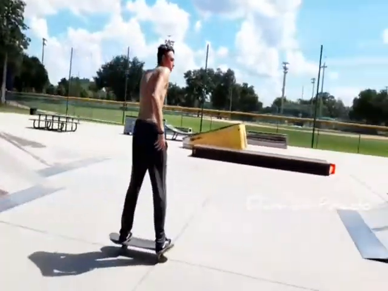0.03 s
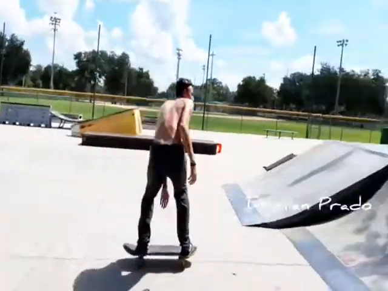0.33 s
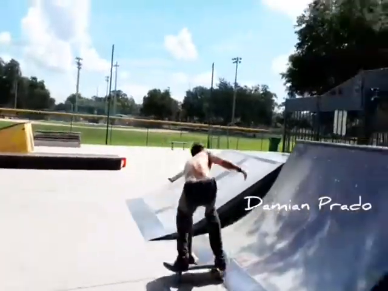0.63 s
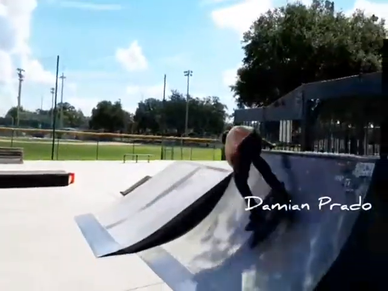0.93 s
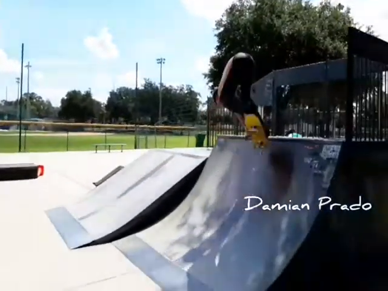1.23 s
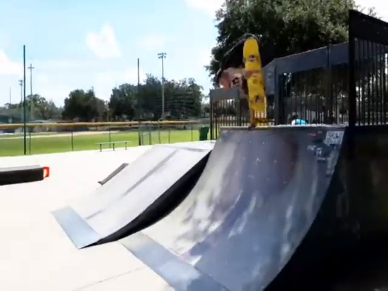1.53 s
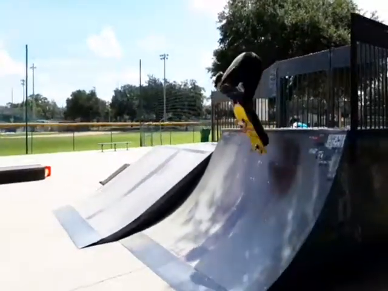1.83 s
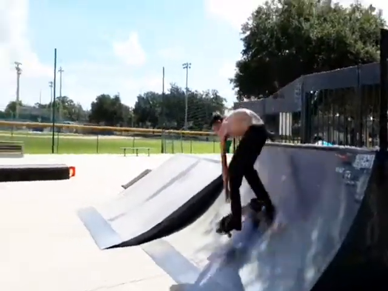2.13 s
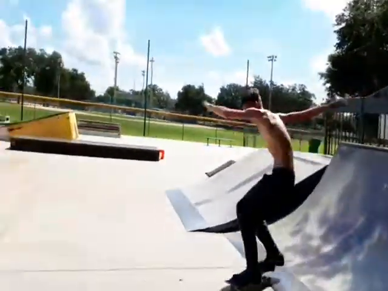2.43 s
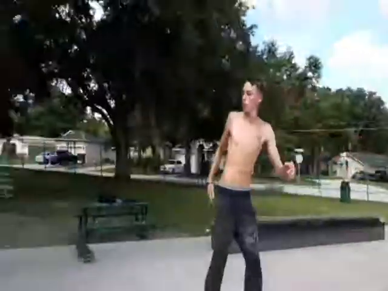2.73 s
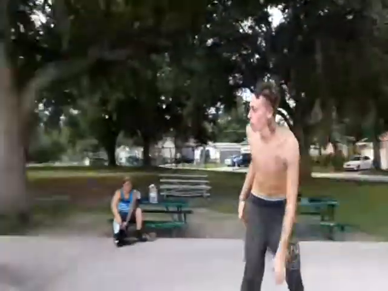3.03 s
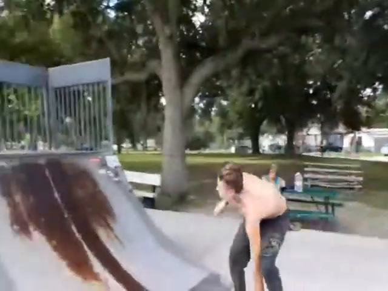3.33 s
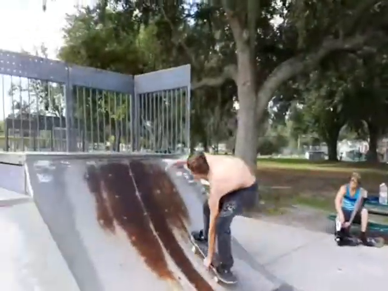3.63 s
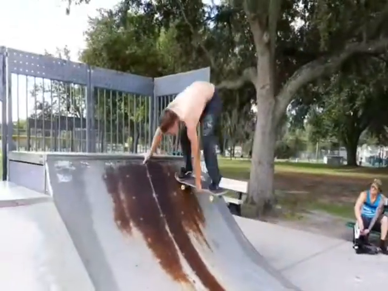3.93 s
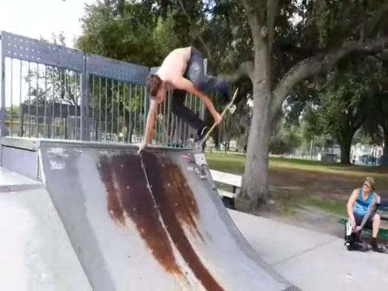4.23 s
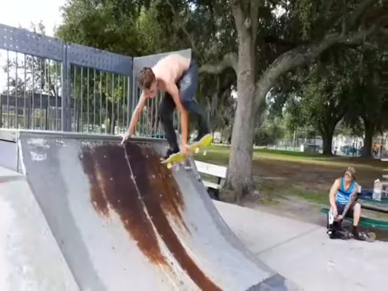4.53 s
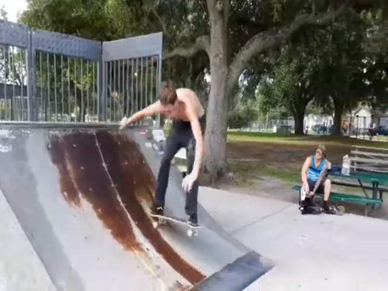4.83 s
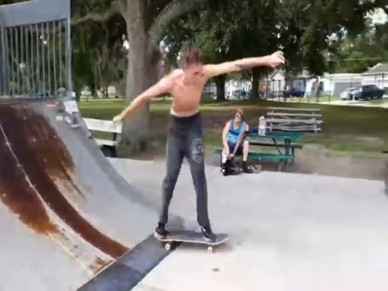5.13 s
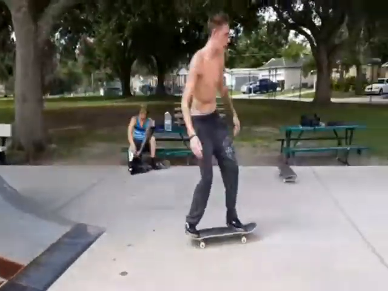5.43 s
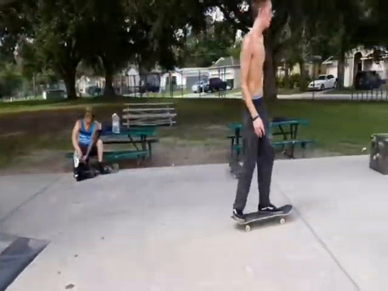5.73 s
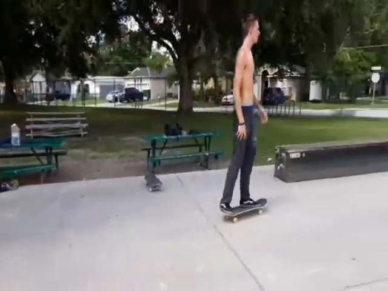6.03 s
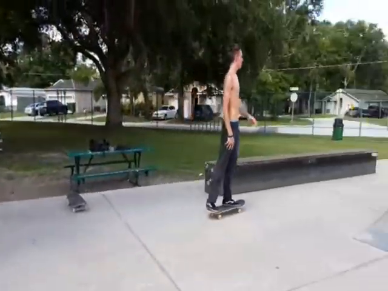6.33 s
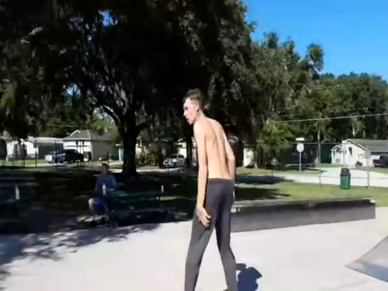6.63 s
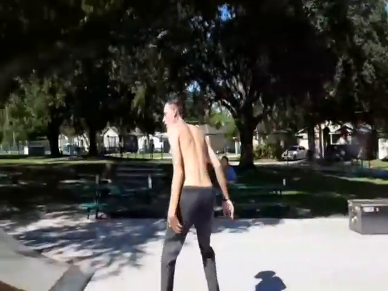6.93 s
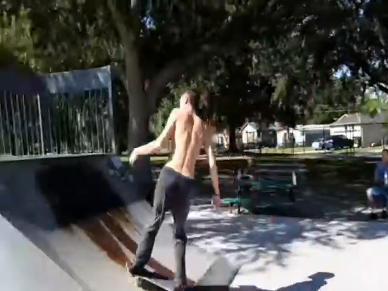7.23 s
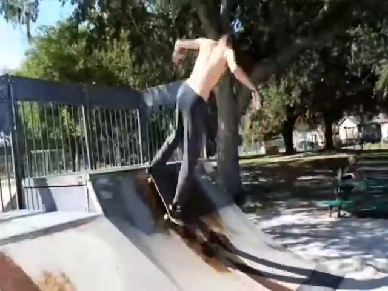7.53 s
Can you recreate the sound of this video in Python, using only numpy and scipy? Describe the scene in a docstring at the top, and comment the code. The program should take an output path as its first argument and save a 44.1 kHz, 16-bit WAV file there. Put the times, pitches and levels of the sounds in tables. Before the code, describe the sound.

A skateboard rolls over concrete and booms up and down hollow steel ramps, with sharp clacks, metal rattles and landing slaps.

```python
"""A skateboard rolls back and forth between two steel quarter pipes in an open park, close by.
Surface roughness drives the hard wheels into a roar and the hollow ramps into a resonant boom.
Impacts excite the modes of ground, deck and trucks as the board clacks over joints, pops off the
coping and slaps down; loose steel lip plates chatter, and gritty hisses fade away.
The impacts scatter into a thin reverberant tail, over distant traffic, leaves and insects."""
import sys
import numpy as np
from scipy import signal
from scipy.fft import rfft, irfft, next_fast_len
from scipy.io import wavfile
from scipy.ndimage import uniform_filter1d, map_coordinates

SR = 44100
rng = np.random.default_rng(int(sys.argv[2]) if len(sys.argv) > 2 else 0)


def unload_audio(sound):
    """Save the sound as a 16-bit wav file, at the path given as the first command line argument."""
    columns = np.transpose(np.atleast_2d(sound))
    # keep every value between -1 and 1, then stretch to whole-number steps
    steps = np.round(np.clip(columns, -1, 1) * 32767)
    wavfile.write(sys.argv[1], SR, steps.astype(np.int16))


N = 339504


def amp(db):
    """Decibels to amplitude ratio."""
    return 10 ** (np.asarray(db) / 20)

def unit(x):
    """Normalisation to rms 1."""
    return x / np.sqrt(np.mean(x ** 2) + 1e-20)

def along(points, hz):
    """Interpolation of (frequency, value) points on a logarithmic axis."""
    frequencies, values = np.transpose(points)
    return np.interp(np.log(hz + 1), np.log(frequencies + 1), values)

def curve(points):
    """Linear interpolation of (time, value) points at every sample."""
    return np.interp(np.arange(N) / SR, *np.transpose(points))

def held(starts, values):
    """A step function: each value holds from its start, with a brief cross-fade."""
    index = np.maximum(np.searchsorted(starts, np.arange(N) / SR, side="right") - 1, 0)
    return uniform_filter1d(np.asarray(values, float)[index], size=SR // 50)

def wobble(rate_hz):
    """Smooth random modulation: a spline through Gaussian knots."""
    knots = rng.standard_normal(int(N * rate_hz / SR) + 4)
    return map_coordinates(knots, [np.arange(N) * rate_hz / SR])

def add(track, start_s, sound):
    """Superposition of a sound on the track."""
    part = track[:, max(round(start_s * SR), 0):][:, :sound.shape[1]]
    part += sound[:, :part.shape[1]]

def panned(x, pan_db):
    """Constant-power panning, positive to the left."""
    gains = amp(np.array([pan_db, -pan_db]).reshape(2, -1) / 2)
    return x * gains / np.sqrt(np.mean(gains ** 2, axis=0))

def filtered(x, response):
    """Linear filtering: the spectrum times a frequency response."""
    n = x.shape[-1]
    padded = next_fast_len(n + 4096, real=True)
    return irfft(rfft(x, padded) * response(np.fft.rfftfreq(padded, 1 / SR)), padded)[..., :n]

def colour(points):
    """A band-pass response that follows a spectrum and falls steeply beyond its ends."""
    low_hz, high_hz = points[0][0], points[-1][0]
    return lambda f: (amp(along(points, f)) * np.minimum(f / low_hz, 1) ** 2
                      / np.sqrt(1 + (f / high_hz) ** 8))

def minimum_phase(gain):
    """Causality: folding the cepstrum gives a response that rings only after the blow."""
    cepstrum = irfft(np.log(gain + 1e-6))
    cepstrum[1:len(gain) - 1] *= 2
    cepstrum[len(gain):] = 0
    return np.exp(rfft(cepstrum))

def body(modes):
    """Modal resonance: damped modes add in power, and little radiates outside their range."""
    def response(f):
        power = sum((amp(db) * f * width) ** 2 / ((hz * hz - f * f) ** 2 + (f * width) ** 2)
                    for hz, width, db in modes)
        skirts = (1 + (modes[0][0] * .6 / (f + 1)) ** 4) * (1 + (f / (modes[-1][0] * 1.2)) ** 8)
        return minimum_phase(np.sqrt(power / skirts))
    return response

# Likeness of left and right: frequency_hz, coherence_ratio
COHERENCE = [(30, .5), (80, .9), (170, .98), (350, .985), (700, .93), (1400, .78), (3000, .62), (6000, .35),
             (12000, .15)]
def radiate(force, response):
    """Partial coherence: two filtered forces give a stereo pair, less alike in the treble."""
    def spread(f):
        angle = np.arccos(np.clip(along(COHERENCE, f), -1, 1)) / 2
        return response(f) * np.array([np.cos(angle), np.sin(angle)])
    mid, side = filtered(force, spread)
    return np.array([mid + side, mid - side])


# Modes of the concrete and the two ramps: pitch_hz, width_hz, level_db
SLAB = [(102, 48, -6), (169, 150, -2), (316, 66, -1), (404, 35, -4.5)]
PALE_RAMP = [(125, 130, -2), (168.4, 20.5, -6), (196, 31, 1.5), (248, 12, 3), (288.4, 20, 1),
             (337, 24, -1.5), (360.4, 12, 4), (411, 43, -3)]
RUSTY_RAMP = [(64, 20, -22), (93, 6.8, 4), (132, 34, -4), (177.4, 27, 1.5), (233, 26, -2.5),
              (295, 24, -0.5), (360, 66, -3.5), (432, 31, -4.5)]
# Surface under the wheels: start_s, boom_over_roar_db, wheel_resonance_ratio, modes
SURFACES = [(0, -3, 0.64, SLAB), (.66, 8, 0.47, PALE_RAMP), (2.6, -1, 0.92, SLAB),
            (3.46, 8, 0.53, RUSTY_RAMP), (5.25, -1.5, 1.31, SLAB), (6.401, 1.5, 1.03, SLAB),
            (7.18, 11, .8, RUSTY_RAMP)]
def ground_boom(force):
    """Forced vibration: each surface in turn booms in its own modes."""
    track, fade = np.zeros((2, N)), SR // 50
    edges = [round(start_s * SR) for start_s, *_ in SURFACES] + [N]
    for start, end, (*_, modes) in zip(edges, edges[1:], SURFACES):
        boom = unit(radiate(force[:, start:end + fade], body(modes)))
        window = signal.windows.tukey(boom.shape[1], 2 * fade / boom.shape[1])
        add(track, start / SR, boom * np.sqrt(np.abs(window)))
    return track

# Wheel hum, rising with speed: time_s, pitch_hz
WHEEL_HUM = [(0, 385), (.35, 440), (.6, 514), (1.1, 350), (2.65, 442), (3.05, 560), (3.4, 524), (4, 370),
             (6.5, 343), (7.15, 430), (7.7, 380)]
# Stretches of rolling contact: start_s, end_s, grit_over_roar_db, hiss_over_roar_db,
# whirr_hz, bearing_hz, sand_hz, treble_pan_db, plate_pan_db
RIDES = [(0, 1.182, -5.5, -8, 860, 2100, 6900, 2.5, 4.5),
         (1.857, 2.676, -5.5, -7.5, 930, 2500, 11200, 2, 3),
         (2.678, 3.997, 1, -8, 1080, 3480, 11300, 0, -6),
         (4.634, 6.578, -1.5, -14, 1000, 3200, 9000, -1.5, -1),
         (6.581, 7.702, 1.1, -6, 930, 3270, 10500, 2.2, 3)]
def wheel_force(hum_db=12, whirr_db=8, bearing_db=4, sand_db=6, width_octaves=0.15, patchy_db=3):
    """Friction noise with four resonance peaks, whose height depends on the surface."""
    hz, t, spectrum = signal.stft(rng.standard_normal((2, N)), SR, nperseg=1024)
    frames = np.minimum((t * SR).astype(int), N - 1)
    ride_starts, _, _, _, whirr, bearing, sand, _, _ = zip(*RIDES)
    pitches = [curve(WHEEL_HUM)] + [held(ride_starts, pitch) for pitch in (whirr, bearing, sand)]
    surface_starts, _, strengths, _ = zip(*SURFACES)
    clarity = held(surface_starts, strengths)[frames]
    patches = uniform_filter1d(rng.standard_normal(spectrum.shape[1:]), size=3, axis=0)
    gain_db = patchy_db * unit(uniform_filter1d(patches, size=10, axis=1))
    for pitch, peak_db in zip(pitches, (hum_db, whirr_db, bearing_db, sand_db)):
        octaves = np.log2(hz + 1)[:, None] - np.log2(pitch[frames])
        gain_db += peak_db * clarity / (1 + (octaves / width_octaves) ** 2)
    return signal.istft(spectrum * amp(gain_db), SR, nperseg=1024)[1][:, :N]

# Roar envelope, following speed and nearness, one list per ride: time_s, level_db
ROLL_LEVELS = [
    [(0, -35), (.25, -34.5), (.42, -33.5), (.75, -30), (.87, -34), (1.0, -44), (1.17, -61)],
    [(1.87, -47), (2.0, -51.5), (2.1, -41.5), (2.17, -53.5), (2.28, -38), (2.46, -31.5), (2.6, -43.5),
     (2.68, -42.5)],
    [(2.68, -37), (3.05, -37.5), (3.45, -37.5), (3.56, -31.5), (3.75, -38), (3.99, -49.5)],
    [(4.65, -38.5), (4.8, -44), (5.05, -48.5), (5.2, -40.5), (5.35, -53.5), (6.25, -52), (6.58, -41.5)],
    [(6.58, -40), (6.9, -41), (7.15, -38), (7.27, -32.5), (7.46, -45), (7.7, -53.5)],
]
# Spectra of rolling noise: frequency_hz, density_db
ROAR_SPECTRUM = [(200, -42), (340, 0), (450, 1), (600, -2), (760, -1), (1050, -4), (1350, -5), (1800, -34)]
GRIT_SPECTRUM = [(1000, -14.5), (1500, -2), (2150, 4), (3200, 1), (4200, -2.5), (5400, -10.5),
                 (6500, -12.5), (8500, -52)]
HISS_SPECTRUM = [(4800, -4.5), (6600, -3.5), (7800, -4.5), (9200, -3), (11000, -5), (12800, -7),
                 (16000, -8.5)]
def rolling(bump_db=0.42, grain_db=2):
    """Roughness excitation: one uneven surface shakes ground, wheels and bearings together."""
    t = np.arange(N) / SR
    roar, grit, hiss = np.zeros((3, N))  # amplitude envelopes
    for (start_s, end_s, grit_db, hiss_db, *_), levels in zip(RIDES, ROLL_LEVELS):
        gain = amp(curve(levels)) * ((t >= start_s) & (t < end_s))
        roar += gain
        grit += amp(grit_db) * gain
        hiss += amp(hiss_db) * gain
    grit, hiss = fading_hisses(grit, hiss)
    surface_starts, boom_db, _, _ = zip(*SURFACES)
    boom = ramp_ring(roar * amp(held(surface_starts, boom_db)))
    boom, roar, grit, hiss = uniform_filter1d(np.array([boom, roar, grit, hiss]), size=SR // 200)
    roughness = amp(bump_db * wobble(45) + grain_db * wobble(900))
    force = roughness * wheel_force()
    bass = amp(-2.2) * boom * ground_boom(roughness * rng.standard_normal((2, N)))
    bass += amp(-2.16) * roar * unit(radiate(force, colour(ROAR_SPECTRUM)))
    treble = amp(-4) * grit * unit(radiate(force, colour(GRIT_SPECTRUM)))
    treble += amp(-0.5) * hiss * unit(radiate(force, colour(HISS_SPECTRUM)))
    ride_starts, *_, pan_db, _ = zip(*RIDES)
    return bass + panned(treble, held(ride_starts, pan_db))

# Distant traffic and leaves: frequency_hz, density_db
PARK_SPECTRUM = [(25, -25), (60, -14.5), (110, -7.5), (230, -7.5), (330, -17), (600, -23), (1500, -25.5),
                 (3500, -30), (7200, -35), (11000, -32.5), (16000, -31)]
# Insect band: pitch_hz, width_hz, level_db
INSECT_BAND = [(8700, 480, 0)]
def park(drone_hz=147, drone_width_hz=7.9):
    """Ambient noise: broadband traffic and leaves, with a narrowband drone and insects."""
    air = unit(radiate(rng.standard_normal((2, N)), colour(PARK_SPECTRUM)))
    drone = unit(filtered(rng.standard_normal(N), body([(drone_hz, drone_width_hz, 0)])))
    insects = unit(filtered(rng.standard_normal((2, N)), body(INSECT_BAND)))
    drone_db = curve([(2, -54), (4, -61)])  # fades as the microphones turn away
    return amp(-55.5 + 0.43 * wobble(3)) * air + amp(drone_db) * drone + amp(-67.5) * insects


def ground_modes(time_s):
    """The modes of the surface under the board at this time."""
    return [modes for start_s, _, _, modes in SURFACES if start_s <= time_s][-1]

def ride_pans(time_s):
    """Left-right level differences in dB of the board's treble and the lip plate."""
    return [ride[-2:] for ride in RIDES if ride[0] <= time_s + .01][-1]

def struck_body(modes, centre_hz, db_per_octave):
    """Selective excitation: the point of contact feeds modes near centre_hz and starves the rest."""
    return body([(hz, width, db - db_per_octave * abs(np.log2(hz / centre_hz)))
                 for hz, width, db in modes])

def strike(envelope, response, rms_span_s, push):
    """Impact excitation: an impulse and rough contact ring a body, at rms 1 over the opening span."""
    force = unit(envelope) * rng.standard_normal((2, len(envelope)))
    force[0, np.argmax(envelope)] += push * np.sqrt(len(envelope))
    ring = radiate(force, response)
    opening = ring[:, :max(int(rms_span_s * SR), 64)]
    return ring / np.sqrt(np.mean(opening ** 2) + 1e-20)

# Modes of the maple deck and metal trucks: pitch_hz, width_hz, level_db
DECK_MODES = [(533, 280, 1.5), (725, 66, 0.5), (782, 42, 2.5), (942, 157, -0.5), (1120, 65, -7.5),
              (1310, 390, -5)]
TRUCK_MODES = [(1780, 460, 1.5), (2160, 710, -4), (3020, 840, -4), (3900, 540, -12), (5480, 530, -2),
               (6200, 700, -16)]
# Contact tick: frequency_hz, density_db
TICK_SPECTRUM = [(4500, 4), (6500, 4), (8000, 0.5), (10500, 1), (13000, -5), (16000, -4)]
def blow(start_s, thud_db, knock_db, crack_db, tick_db, t60_s, thud_hz, knock_hz, crack_hz):
    """Transient response: one contact thuds in the ground, knocks the deck and cracks in the trucks."""
    t = np.arange(SR // 7) / SR
    contact = (1 - np.exp(-t / .0005)) * amp(-60 * t / max(t60_s, .005))
    ground = struck_body(ground_modes(start_s), thud_hz, db_per_octave=18)
    deck = struck_body(DECK_MODES, knock_hz, db_per_octave=26.5)
    trucks = struck_body(TRUCK_MODES, crack_hz, db_per_octave=15.5)
    thud = amp(thud_db) * strike(contact, ground, rms_span_s=0.021, push=0.74)
    knock = amp(knock_db) * strike(contact, deck, rms_span_s=0.0082, push=0.45)
    crack = amp(crack_db) * strike(contact, trucks, rms_span_s=0.0079, push=0.48)
    tick = amp(tick_db) * strike(contact, colour(TICK_SPECTRUM), rms_span_s=0.028, push=0.51)
    return thud + knock + panned(crack + tick, ride_pans(start_s)[0])

# Joints in the concrete: start_s, axle_gap_s, first_knock_db, second_knock_db, tick_db, knock_hz
JOINT_HITS = [(0.086, .088, -28.5, -25.5, -36.5, 670), (2.861, .09, -30, -31, -48, 674),
              (5.718, .175, -39, -40, -60, 950), (6.608, .086, -28, -31, -37, 596)]
def joints():
    """Paired impacts: the front axle and then the rear clack over the same joint."""
    track = np.zeros((2, N))
    for start_s, gap_s, first_db, second_db, tick_db, knock_hz in JOINT_HITS:
        for at_s, db in ((start_s, first_db), (start_s + gap_s, second_db)):
            clack = blow(at_s, thud_db=db - 2, knock_db=db, crack_db=db - 9, tick_db=tick_db,
                         t60_s=.045, thud_hz=345, knock_hz=knock_hz, crack_hz=2800)
            add(track, at_s, clack)
    return track

# Modes of a steel lip plate: pitch_hz, width_hz, level_db
PLATE_MODES = [(1940, 1100, -1.5), (2630, 640, -6.5), (3630, 380, -0.5), (4240, 290, 1.5), (4660, 310, 3),
               (5200, 340, 4.5), (5750, 280, -0.5)]
# Axles crossing a plate: start_s, length_s, thud_db, knock_db, clash_db, tick_db, thud_hz
PLATE_CROSSINGS = [(0.656, 0.024, -21.5, -23.5, -23.5, -32, 260),
                   (0.739, 0.018, -33, -22.5, -13.5, -22.5, 300),
                   (0.764, 0.029, -17.5, -25, -31, -23.5, 330), (2.324, 0.054, -22.5, -33.5, -29, -41, 188),
                   (2.455, 0.0067, -39, -31.5, -22.5, -35, 263), (3.537, .024, -11, -25, -29, -39, 367),
                   (3.612, .02, -18, -30.5, -38.5, -44, 240), (5.07, 0.038, -13.5, -25, -18, -27, 407),
                   (5.117, 0.023, -22, -32, -24, -27, 199), (5.196, 0.011, -25, -32.5, -26, -41, 365),
                   (7.185, 0.012, -19, -23.5, -15.5, -31, 378),
                   (7.26, 0.011, -19, -24.5, -13.5, -30.5, 323), (7.33, 0.0172, -27, -39, -27, -53, 290)]
def lip_plates(chatter_db=3, chatter_hz=900, sag_db=3, attack_s=0.0013, t60_s=0.096):
    """Contact chatter: an axle slams the loose sheet, which rattles on the concrete and settles."""
    track, t = np.zeros((2, N)), np.arange(SR // 5) / SR
    for start_s, length_s, thud_db, knock_db, clash_db, tick_db, thud_hz in PLATE_CROSSINGS:
        decay_db = sag_db * np.minimum(t / length_s, 1) + 60 * np.maximum(t - length_s, 0) / t60_s
        load = (1 - np.exp(-t / attack_s)) * amp(-decay_db)
        chatter = load * amp(chatter_db * map_coordinates(rng.standard_normal(256), [t * chatter_hz]))
        ground = struck_body(ground_modes(start_s), thud_hz, db_per_octave=10.5)
        thud = amp(thud_db - 6.5) * strike(chatter, ground, length_s + 0.004, push=0.41)
        knock = amp(knock_db) * strike(chatter, body(DECK_MODES), length_s, push=0.15)
        clash = amp(clash_db) * strike(chatter, body(PLATE_MODES), length_s, push=0.36)
        tick = amp(tick_db) * strike(chatter, colour(TICK_SPECTRUM), length_s, push=.1)
        add(track, start_s, thud + knock + panned(clash, ride_pans(start_s)[1]) + tick)
    return track

# Seams on and near the ramps: start_s, thud_db, knock_db, crack_db, thud_hz, knock_hz
SEAM_HITS = [(0.725, -21.5, -18.5, -35, 355, 1130), (0.82, -17.5, -28.5, -43, 350, 480),
             (2.027, -38, -38, -46, 270, 785), (2.048, -32.5, -32, -43.5, 303, 870),
             (2.301, -24.5, -34, -54, 272, 543), (2.601, -35, -28.5, -35.5, 420, 533),
             (3.47, -25.5, -23.5, -32.5, 139, 520), (3.552, -19, -27, -23.5, 355, 500),
             (7.245, -19.5, -23, -39, 320, 730), (7.321, -24, -30, -37, 293, 820)]
def seams(doubling_db=14.5):
    """Impact decay: wheels thump over seams, and a heavier thump shakes for longer."""
    track = np.zeros((2, N))
    for start_s, thud_db, knock_db, crack_db, thud_hz, knock_hz in SEAM_HITS:
        t60_s = 0.047 * 2 ** ((thud_db + 25) / doubling_db)
        thump = blow(start_s, thud_db, knock_db, crack_db, tick_db=knock_db - 11.5,
                     t60_s=t60_s, thud_hz=thud_hz, knock_hz=knock_hz, crack_hz=2800)
        add(track, start_s, thump)
    return track

# Pops off the coping and landings: start_s, thud_db, knock_db, crack_db, ring_db, tick_db,
# t60_s, thud_hz, knock_hz, crack_hz, rebound_s, rebound_db
BOARD_SLAPS = [(1.176, -36.5, -27, -21.5, -44, -29, .012, 201, 890, 2100, 0.0064, -13.5),
               (1.862, -22, -24, -20, -25, -30, 0.048, 285, 1170, 1900, .022, -8),
               (2.194, -24.5, -29, -30.5, -24.5, -31.5, 0.0327, 270, 1060, 1990, .044, -11),
               (3.996, -31, -26, -19.5, -29, -29, .016, 129, 766, 2550, 0.0097, -14),
               (4.634, -30.5, -23, -18.5, -34, -35, .028, 250, 1080, 2730, .025, -5.5),
               (4.719, -19, -20.5, -21.5, -26, -31.5, 0.037, 141, 744, 2120, 0.031, -15.5),
               (7.65, -31.5, -30.5, -39, -33, -45, .055, 276, 780, 1700, .02, -18)]
def slaps():
    """Inelastic collision: the board strikes the ramp and rebounds once, more weakly."""
    track = np.zeros((2, N))
    for start_s, thud_db, knock_db, crack_db, _, *timbre, rebound_s, rebound_db in BOARD_SLAPS:
        for at_s, db in ((start_s, 0), (start_s + rebound_s, rebound_db)):
            add(track, at_s, amp(db) * blow(at_s, thud_db, knock_db, crack_db, *timbre))
    return track

def ramp_ring(boom, t60_s=0.38):
    """Free decay: the hollow ramp rings after each slap, adding power to the boom envelope."""
    t = np.arange(N) / SR
    for start_s, _, _, _, ring_db, *_ in BOARD_SLAPS:
        ring = (t >= start_s) * amp(ring_db - 60 * np.abs(t - start_s) / t60_s)
        boom = np.hypot(boom, ring)
    return boom

# Fading gritty hisses (the pop's echo, wheels spinning on, a brief scuff):
# start_s, end_s, grit_db, hiss_db, half_amplitude_s
HISS_TAILS = [(1.19, 1.86, -51, -58, 0.088), (1.87, 2.152, -48, -45.5, 0.11), (2.082, 2.134, -38, -44, .06),
              (4.026, 4.64, -32, -44.5, 0.03), (5.269, 6.295, -37.5, -59, 0.11),
              (7.586, 7.7, -37, -39, 0.0079)]
def fading_hisses(grit, hiss):
    """Hyperbolic decay: each fading tail adds its power to the grit and hiss envelopes."""
    t = np.arange(N) / SR
    for start_s, end_s, grit_db, hiss_db, half_s in HISS_TAILS:
        tail = ((t >= start_s) & (t < end_s)) / (1 + np.abs(t - start_s) / half_s)
        grit = np.hypot(grit, amp(grit_db) * tail)
        hiss = np.hypot(hiss, amp(hiss_db) * tail)
    return grit, hiss


# The board's direction, as a delay between the microphones: time_s, left_lag_ms
ARRIVAL_LAG = [(0, -0.022), (.7, -0.07), (1.2, -0.0088), (1.9, 0.08), (2.8, 0.08), (3.2, 0.12),
               (3.6, 0.039), (4, -0.046), (7.7, -0.033)]
def arrival(x):
    """Path difference: sound reaches the nearer microphone first."""
    half_lag = curve(ARRIVAL_LAG) / 1000 * SR / 2
    return np.array([map_coordinates(side, [np.arange(N) + shift])
                     for side, shift in zip(x, (-half_lag, half_lag))])

# Reverberation time of the park: frequency_hz, t60_s
DECAY_TIMES = [(150, 0.96), (400, 0.5), (1500, 0.28), (6000, .3), (14000, 0.62)]
def reverberation(x, onset_s=0.012):
    """Diffuse scattering: ramps, fences and trees return a thin, exponentially decaying tail."""
    hz, t, spectrum = signal.stft(rng.standard_normal((2, SR // 2)), SR, nperseg=256)
    decay = amp(-60 * t / along(DECAY_TIMES, hz)[:, None])
    tail = signal.istft(spectrum * decay, SR, nperseg=256)[1]
    onset = np.minimum(np.arange(tail.shape[1]) / SR / onset_s, 1)
    tail = radiate(tail * onset, np.ones_like)
    return signal.fftconvolve(x, tail / np.linalg.norm(tail[0]), axes=1)[:, :N]

def scene():
    """Superposition of the board's direct sound, the reverberation of its impacts and the park."""
    impacts = joints() + seams() + slaps() + lip_plates()
    return arrival(rolling() + impacts) + amp(-11) * reverberation(impacts) + park()

# Shading by the microphones' housing: frequency_hz, left_over_right_db
SHADING = [(60, 0.5), (250, 0.65), (700, 0.3), (1300, 2), (2300, 1), (4400, -10.5), (8000, -3.5),
           (15000, 1.5)]
def record(dry, top_hz=16000):
    """Acoustic shadowing tilts left against right; peaks are rounded and the band is limited."""
    shaded = filtered(dry, lambda f: amp(np.array([along(SHADING, f), -along(SHADING, f)]) / 2))
    rounded = shaded / (1 + np.abs(shaded) ** 6) ** (1 / 6)
    return filtered(rounded, lambda f: f < top_hz)


dry = scene()
out = record(dry)
unload_audio(out)
```